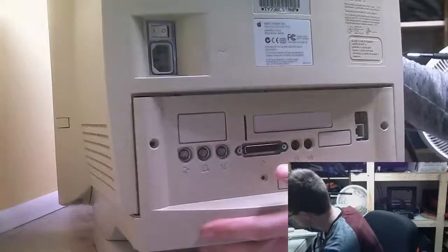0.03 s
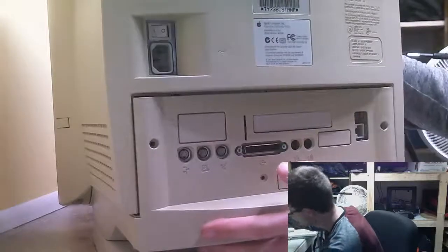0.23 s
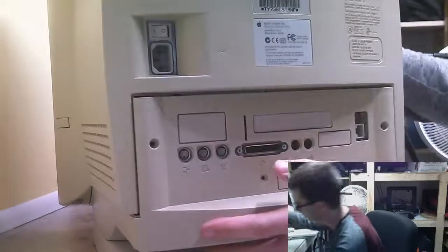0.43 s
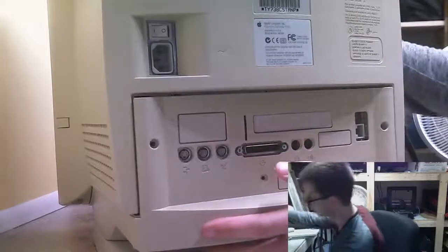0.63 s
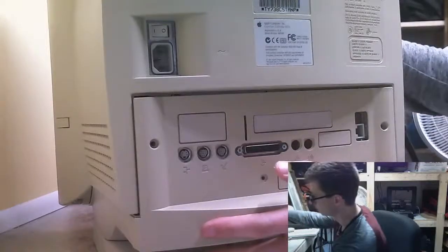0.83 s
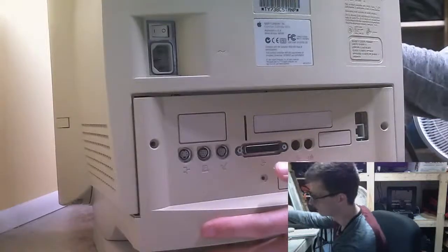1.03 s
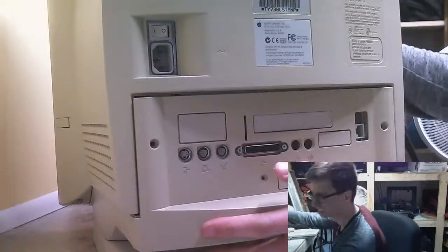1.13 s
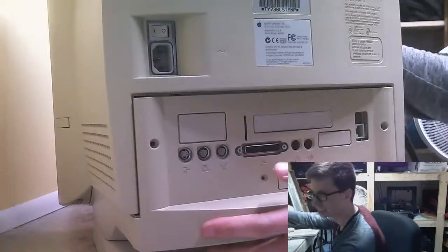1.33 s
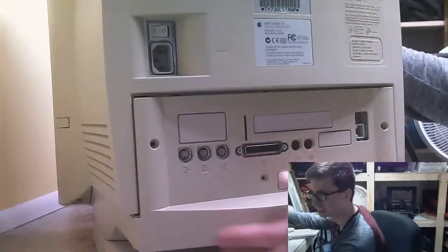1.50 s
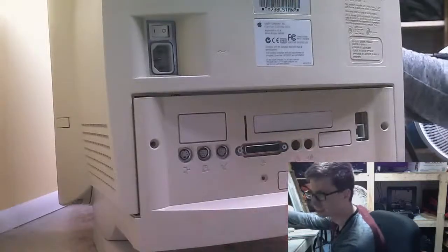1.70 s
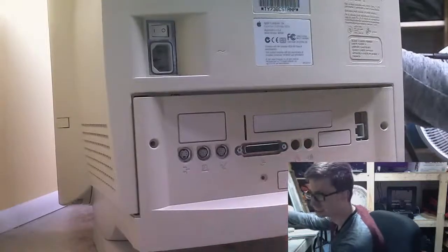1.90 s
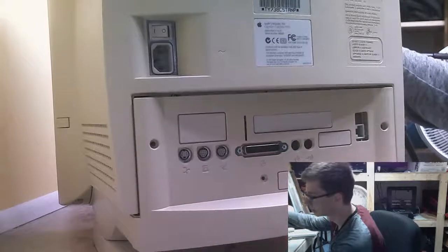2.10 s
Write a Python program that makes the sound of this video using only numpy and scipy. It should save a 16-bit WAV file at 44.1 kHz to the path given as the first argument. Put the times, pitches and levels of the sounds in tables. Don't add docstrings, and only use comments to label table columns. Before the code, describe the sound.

One loud, sharp crack of brittle plastic, then faint ticks and soft knocks in a quiet room

```python
import sys
import numpy as np
from scipy import signal
from scipy.fft import rfft, irfft
from scipy.io import wavfile
from scipy.ndimage import uniform_filter1d

SR = 44100
rng = np.random.default_rng(int(sys.argv[2]) if len(sys.argv) > 2 else 0)


def rack_gain(trim_db):
    fader = np.asarray(trim_db, float)
    return 10 ** (fader / 20)


def store_wav(level_fs):
    pcm = np.round(np.clip(np.atleast_2d(level_fs), -1, 1) * 32767)
    wavfile.write(sys.argv[1], SR, pcm.T.astype(np.int16))


N = 94815


def evened(x):
    return x / np.sqrt(np.mean(x ** 2) + 1e-20)


def read(points, hz):
    f, value = np.transpose(points)
    return np.interp(np.log(hz + 1), np.log(f + 1), value)


def add(mix, s, sound):
    part = mix[max(round(s * SR), 0):][:len(sound)]
    part += sound[:len(part)]


def tint(x, db_of_hz):
    hz = np.fft.rfftfreq(len(x), 1 / SR)
    return irfft(rfft(x) * rack_gain(db_of_hz(hz)), len(x))


def ring(hz, t60, phase, swell_s=0.0001):
    t = np.arange(int(1.2 * t60 * SR)) / SR
    swell = 1 - np.exp(-(t / swell_s) ** 2)
    return swell * rack_gain(-60 * t / t60) * np.cos(2 * np.pi * (hz * t + phase))


# start in
# seconds, level in dB.
SLIPS = [(0.2452, -36), (.2440, -19.5), (0.2446, 1.5), (.2460, 0.5), (0.2471, 0), (.2490, -3.5),
         (0.251, -12), (0.2522, -9), (0.2557, -13.5), (0.2582, -13), (.2645, -18), (.2685, -19),
         (.2795, -24.5)]
MAIN_SLIP_S = SLIPS[2][0]
# frequency in Hz, level in dB per Hz.
SNAP_SPECTRUM = [(150, -30), (500, -8), (900, -4.5), (2000, -11), (4300, -9), (6400, 2), (8500, -8),
                 (14000, -3.5)]


def splintering():
    out, t = np.zeros(N), np.arange(4096) / SR
    peak_s, level_db = 0.00072, -2.5
    pulse = np.e * t / peak_s * np.exp(-t / peak_s)
    for s, db in SLIPS:
        grit = evened(tint(rng.standard_normal(len(t)), lambda hz: read(SNAP_SPECTRUM, hz)))
        add(out, s, rack_gain(db + level_db) * grit * pulse)
    return out


# frequency in Hz, level in dB, t60 in seconds.
SHELL_MODES = [(420, -9, .12), (483, -9, .1), (561, 4, .1), (685, -1.5, 0.15), (876, 1.5, .09),
               (909, 0, .1), (1091, -5, .16), (1222, -2.5, 0.13), (1489, -2.5, .1), (1746, 0.5, 0.062),
               (2480, -4.5, .09), (2986, -6.5, .1), (3162, -0.5, .09), (6105, 4, .08)]
# frequency in Hz, level in dB, t60 in seconds, swell in seconds.
PANEL_MODES = [(414.7, -0.5, 0.16, .018), (477.4, -4, .19, .022), (611, -9.5, .15, .01),
               (840.1, -4.5, 0.15, .003), (950, -2, .11, .003), (1417, -4, .13, .004),
               (1570, -7, .12, .004), (3612, -8.5, 0.061, 0.0034), (4098, -5, .09, 0.0022),
               (4390, -2.5, 0.092, 0.0015), (6030, -2, .09, 0.0028), (6520, -4.5, 0.082, 0.0034),
               (8850, -6, 0.099, .002), (9650, -8, .09, 0.0018)]


def shell_and_panel():
    out = np.zeros(N)
    shell = [(hz, db, t60, 2 / hz) for hz, db, t60 in SHELL_MODES]
    for modes in (shell, PANEL_MODES):
        for k, (hz, db, t60, swell_s) in enumerate(modes):
            sign = (-1) ** k
            mode = ring(hz, t60, rng.uniform(.7, .8), swell_s)
            add(out, MAIN_SLIP_S, sign * rack_gain(db - 17) * mode)
    return out


# frequency in Hz, level in dB per Hz.
ECHO_SPECTRUM = [(300, -21), (500, -10.5), (1800, -12.5), (3000, -12), (5200, -16), (6200, -10),
                 (7400, -17), (16300, -18)]
# frequency in Hz, t60 in seconds.
ECHO_DECAY = [(80, 0.35), (300, 0.18), (700, .16), (3000, 0.14), (6000, .145), (15000, .135)]


def room_echo():
    out = np.zeros(N)
    rise_s, level_db = 0.0064, -11.5
    hz, frame_s, z = signal.stft(rng.standard_normal(SR), SR, nperseg=256, noverlap=192)
    decay_db = 60 * frame_s / read(ECHO_DECAY, hz)[:, None]
    z = z * rack_gain(read(ECHO_SPECTRUM, hz)[:, None] - decay_db)
    tail = signal.istft(z, SR, nperseg=256, noverlap=192)[1]
    tail = tail / np.sqrt(np.mean(tail[:200] ** 2))
    rise = 1 - np.exp(-(np.arange(len(tail)) / SR / rise_s) ** 2)
    add(out, MAIN_SLIP_S, rack_gain(level_db) * tail * rise)
    return out


def crack():
    low_cut = signal.butter(3, 240, "high", fs=SR, output="sos")
    return signal.sosfilt(low_cut, splintering() + shell_and_panel() + room_echo())


# frequency in Hz, t60 in seconds, level in dB from the
# earlier knock, level in dB from the crack, level in dB from the settling tick.
STEEL_MODES = [(1140, 0.88, -67, -50.5, -63.5), (1550, .44, -60, -60.5, -77), (1740, .5, -61.5, -58, -81),
               (948.4, 0.51, -69.5, -70, -75), (1200, .8, -75.5, -66, -72), (1769, .6, -63.5, -52.5, -83),
               (1980, 0.48, -72.5, -66, -101), (2010, 0.75, -67.5, -58, -82),
               (2014.6, .5, -71.5, -66.5, -95), (1255, 0.55, -76, -58, -70.5), (956, .8, -77.5, -61.5, -70),
               (5719, .8, -95.5, -75, -88), (457, .5, -73, -53, -63)]
STEEL_STRUCK_S = [
    0,
    .245,
    .535,
]


def chassis():
    out = np.zeros(N)
    for hz, t60, *levels in STEEL_MODES:
        for s, db in zip(STEEL_STRUCK_S, levels):
            add(out, s, rack_gain(db) * ring(hz, t60, rng.random(), 0.0048))
    return out


# start in seconds, level in dB, centre in Hz,
# width in octaves, t60 in seconds.
TICKS = [(.535, -66, 2397, 1.16, .05), (.607, -72, 5926, 1.5, 0.029), (1.021, -55, 6505, 0.92, 0.0081),
         (1.021, -63.5, 3496, .2, .01), (1.0208, -61, 5270, .18, 0.0098), (0.104, -78, 5000, 0.55, 0.11),
         (1.093, -66.5, 4204, 0.98, .007), (1.119, -71, 10500, .8, .007), (1.475, -63, 998, 0.75, 0.033),
         (1.479, -65, 2198, 1.7, .03), (1.484, -56, 1000, 1.2, 0.041), (1.488, -55, 5500, 0.7, 0.033),
         (1.496, -52.5, 2130, 3.1, 0.042), (1.499, -56, 1800, 0.61, 0.057), (1.583, -67, 12000, 0.63, .05),
         (1.584, -68, 6400, .3, .05), (1.7235, -61, 2294, 3.5, 0.037), (1.74, -69, 1700, .9, 0.03),
         (1.754, -59.5, 1170, 0.89, 0.046), (1.761, -68.5, 1700, 0.66, 0.072),
         (1.856, -67.5, 910, 1.2, .04), (1.807, -65.5, 1190, 1.4, 0.053), (1.928, -72, 1200, 1.25, .04),
         (1.9829, -46, 1440, 0.85, 0.068), (1.992, -59.5, 1500, 0.79, 0.19),
         (1.985, -62.5, 6300, 0.46, 0.048), (2.1226, -62.5, 1312, 0.98, 0.04),
         (2.128, -74.5, 2000, .8, .15)]


def ticks():
    out, t = np.zeros(N), np.arange(8192) / SR
    tail_db, tail_t60, ring_db, ring_share = -27, 0.27, -11.5, 0.68
    noise = rng.standard_normal((len(TICKS), len(t)))
    chance = rng.random((len(TICKS), len(SHELL_MODES), 2))
    for (s, db, centre_hz, octaves, t60), row, draws in zip(TICKS, noise, chance):
        colour_db = lambda hz: -9 * (np.log2((hz + 1) / centre_hz) / octaves) ** 2
        fade = rack_gain(-60 * t / t60) + rack_gain(tail_db - 60 * t / tail_t60)
        attack = np.minimum(t / 0.00013, 1)
        add(out, s, rack_gain(db) * fade * attack * evened(tint(row, colour_db)))
        for (hz, _, mode_t60), (phase, detune) in zip(SHELL_MODES, draws):
            hz = hz * (1 + 0.18 * (detune - .5))
            mode = ring(hz, min(ring_share * mode_t60, 1.5 * t60), phase)
            add(out, s, rack_gain(db + ring_db + colour_db(hz)) * mode)
    return out


# start in seconds, level in dB,
# brightness in dB per octave, share of the free ring time.
KNOCKS = [(0, -38.5, -5.5, 0.68), (0.247, -31, -1.5, 0.98), (1.497, -39.5, 0.5, 0.44),
          (1.506, -43.5, -4.5, 0.34), (1.521, -45, -2, 0.48), (1.548, -47.5, -5.5, 0.42),
          (1.771, -44, -7.5, .7), (1.788, -51, -2, 0.54), (1.805, -47.5, -9.5, 0.67),
          (1.856, -56, -5, 0.51), (1.986, -43, 3, 0.43), (2.001, -47.5, 0.5, 0.58),
          (2.015, -48.5, -7.5, 0.86), (2.09, -54, -5, .9)]
# frequency in Hz, level in dB, t60 in seconds, swell in seconds.
DESK_MODES = [(70, 1, 0.23, 0.027), (119, -3, .15, 0.01), (170.5, 1, .2, .01), (270.16, 1, .2, 0.0049),
              (320, -1.5, 0.22, .006), (411, -3.5, 0.33, .008), (541, -5.5, 0.37, 0.0045),
              (670, -9.5, 0.04, 0.0048)]


def desk():
    out, chance = np.zeros(N), rng.random((len(KNOCKS), len(DESK_MODES), 3))
    for (s, db, tilt_db, ring_share), draws in zip(KNOCKS, chance):
        for (hz, mode_db, t60, swell_s), (phase, detune, spread) in zip(DESK_MODES, draws):
            level_db = db - 6 + mode_db + tilt_db * np.log2(hz / 200) + 4 * (spread - .5)
            mode = ring(hz * (1 + .06 * (detune - .5)), ring_share * t60, phase, swell_s)
            add(out, s, rack_gain(level_db) * mode)
    return out


# start in seconds, length in seconds, level in dB, dullness in dB.
RUBS = [
    (1.488, 0.14, -66.5, -4),
    (1.577, 0.035, -67, 15),
    (1.536, 0.084, -69.5, -8),
    (1.646, .065, -76, 10),
    (1.729, 0.063, -74, 12),
    (1.998, 0.078, -70, 3),
]
# frequency in Hz, level in dB per Hz.
RUB_SPECTRUM = [(300, -13), (2500, -6.5), (3770, -11.5), (6300, -3), (7710, -8.5), (13700, -10),
                (16000, -15)]


def fingers():
    out, noise = np.zeros(N), rng.standard_normal((len(RUBS), 2, 12000))
    for (s, length, db, dull_db), (hiss, roughness) in zip(RUBS, noise):
        colour_db = lambda hz: read(RUB_SPECTRUM, hz) + dull_db * np.log2(1 + 3000 / (hz + 200)) / 2
        progress = np.clip(np.arange(len(hiss)) / SR / length, 0, 1)
        arch = np.sin(np.pi * progress ** 0.74) ** 1.04
        grain = rack_gain(1.5 * evened(uniform_filter1d(roughness, size=150)))
        add(out, s, rack_gain(db) * evened(tint(hiss, colour_db)) * grain * arch)
    return out


# start in seconds, level in dB,
# rise in seconds, t60 in seconds, brightness in dB per octave.
WASHES = [(0, -58.5, 0.00039, 1, -2), (.25, -53.5, 0.013, 1, 2.5), (.535, -64, .005, 0.56, 3),
          (.6, -72, 0.0098, .3, 6.5), (1.475, -54.5, 0.014, 0.36, 0.5), (1.569, -70, .02, 0.35, 5),
          (1.65, -67.5, 0.0098, 0.41, 6.5), (1.72, -62, 0.018, 0.7, 0), (1.801, -59.5, 0.012, 0.71, -3.5),
          (1.92, -76.5, .01, 0.49, 5), (1.984, -42.5, 0.0021, 0.16, 1), (2.117, -68.5, 0.0051, 0.35, 3.5)]
# frequency in Hz, level in dB per Hz.
WASH_SPECTRUM = [(40, -7), (100, 0), (400, -2), (1000, -12), (2000, -20.5), (3500, -35), (8000, -44.5),
                 (16000, -52)]


def wash():
    out, t = np.zeros(N), np.arange(SR) / SR
    noise = rng.standard_normal((len(WASHES), SR))
    for (s, db, rise_s, t60, tilt_db), row in zip(WASHES, noise):
        colour_db = lambda hz: read(WASH_SPECTRUM, hz) + tilt_db * np.log2(hz / 500 + 0.0099)
        swell = 1 - np.exp(-t / rise_s)
        add(out, s, rack_gain(db - 60 * t / t60) * swell * evened(tint(row, colour_db)))
    return out


# frequency in Hz, level in dB per Hz.
FLOOR_SPECTRUM = [(15, -15.5), (35, -6), (110, -7), (150, -17.5), (330, -17.5), (780, -29), (3200, -41.5),
                  (15900, -47)]
# frequency in Hz, width in Hz, level in dB.
FAN_BANDS = [(254, 89, -75.5), (433, 41, -79), (988.6, 120, -79.5), (1260, 100, -90.5)]


def fan():
    out = rack_gain(-64) * evened(tint(rng.standard_normal(N), lambda hz: read(FLOOR_SPECTRUM, hz)))
    for band_hz, width, db in FAN_BANDS:
        resonance_db = lambda hz: -20 * np.log10(1 + (2 * (hz - band_hz) / width) ** 2)
        out += rack_gain(db) * evened(tint(rng.standard_normal(N), resonance_db))
    return out


# frequency in Hz, rms level in dB.
HUM_TONES = [(59.2, -68.5), (118.4, -67), (242.2, -77), (269.2, -77), (457.6, -78.5), (543.7, -79.5),
             (1028, -87), (1130, -86), (1680, -92.5), (5367, -103), (7671, -97.5), (12958, -101)]


def hum():
    out, t = np.zeros(N), np.arange(N) / SR
    for hz, db in HUM_TONES:
        drift = uniform_filter1d(rng.standard_normal(N), size=4000)
        waver = evened(uniform_filter1d(drift, size=4000))
        tone = np.sin(2 * np.pi * (hz * t + rng.random()))
        out += np.sqrt(2) * rack_gain(db - 0.5 + 2.5 * waver) * tone
    return out


def scene():
    case = crack() + chassis() + ticks()
    return (case + desk() + fingers() + wash() + fan() + hum())[None]


def top_cut(x):
    return signal.sosfilt(signal.butter(12, 16480, fs=SR, output="sos"), x)


def record(dry):
    ceiling, edge_hz = 1.1, 15800
    held = dry / (1 + np.abs(dry / ceiling) ** 4) ** (1 / 4)
    low_pass = signal.firwin(255, edge_hz, window=("kaiser", 5), fs=SR)
    mix = signal.oaconvolve(held, low_pass[None], "same")
    return top_cut(mix)


dry = scene()
out = record(dry)
store_wav(out)
```